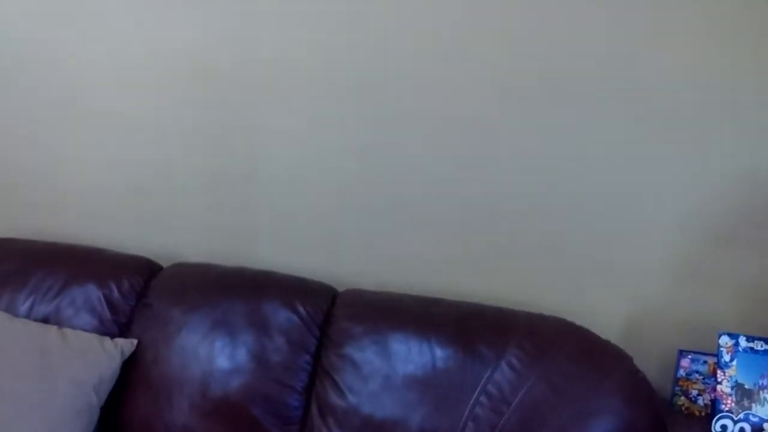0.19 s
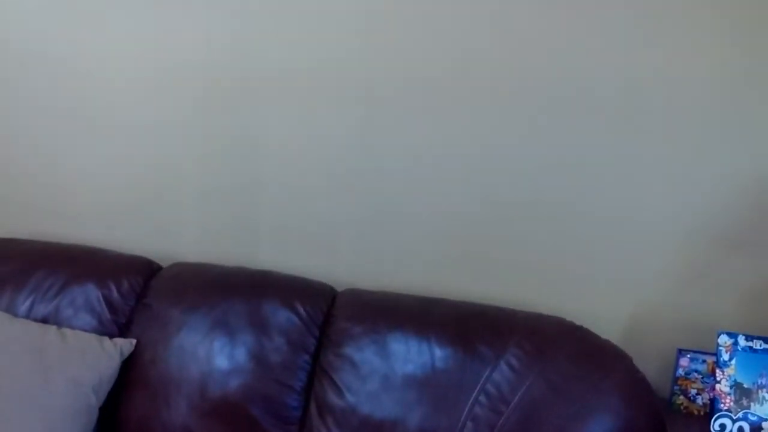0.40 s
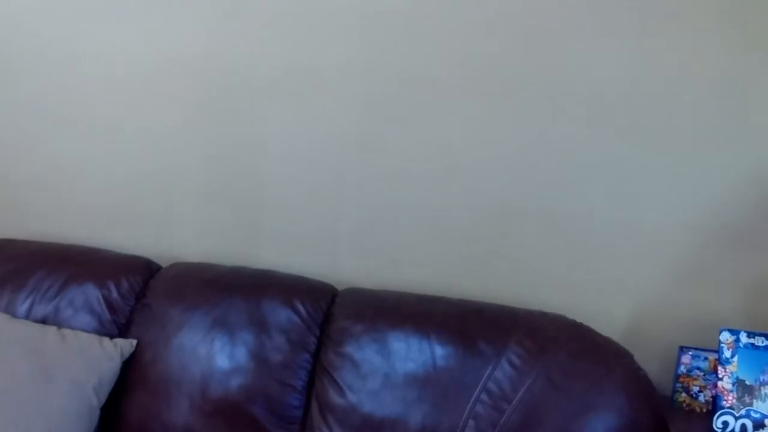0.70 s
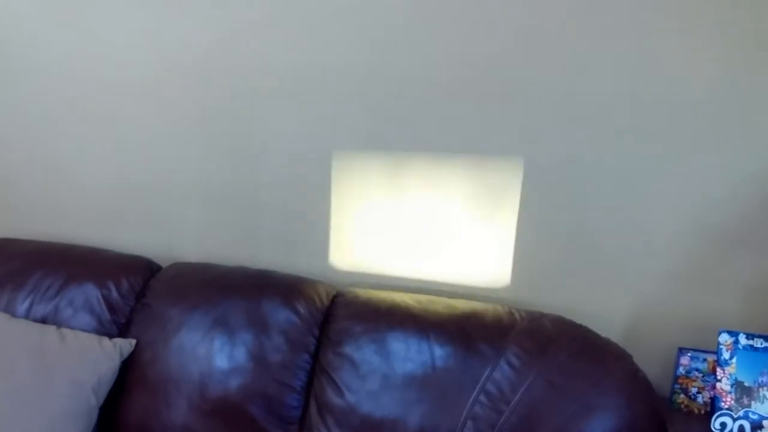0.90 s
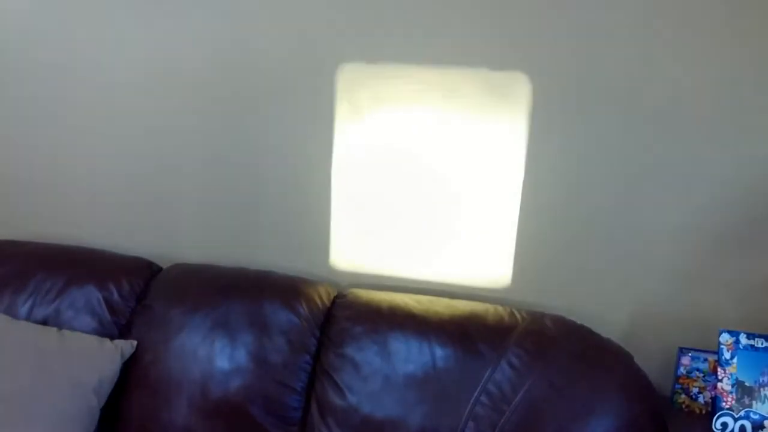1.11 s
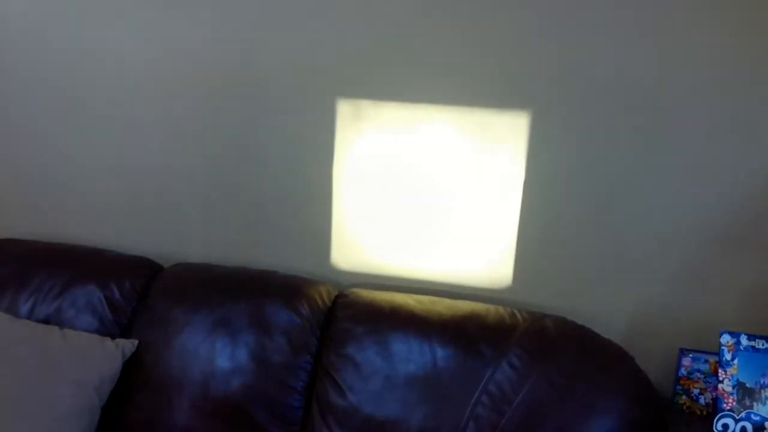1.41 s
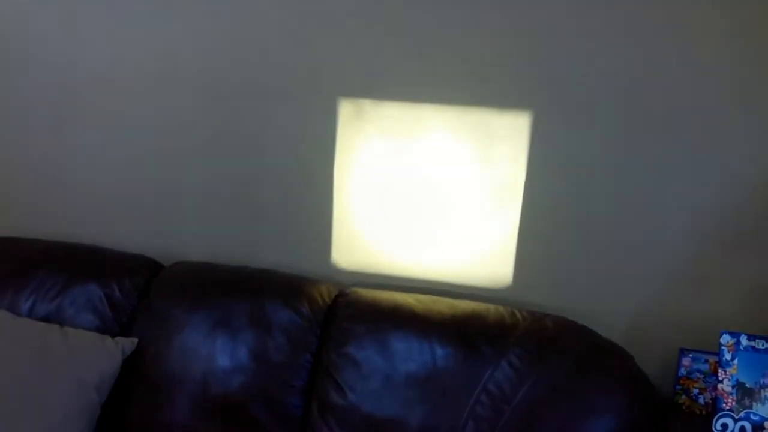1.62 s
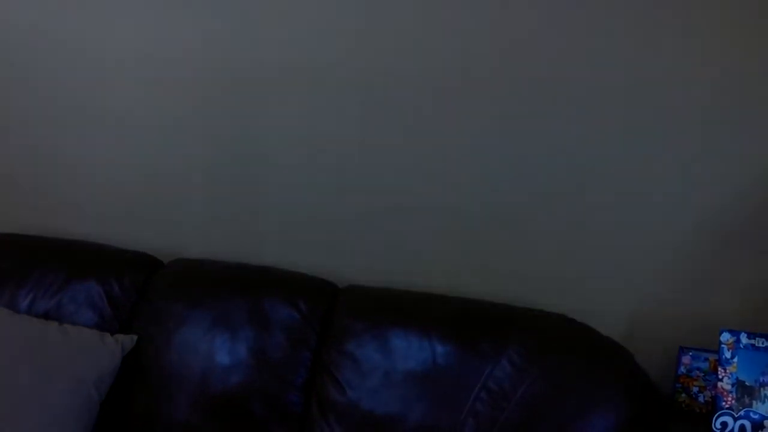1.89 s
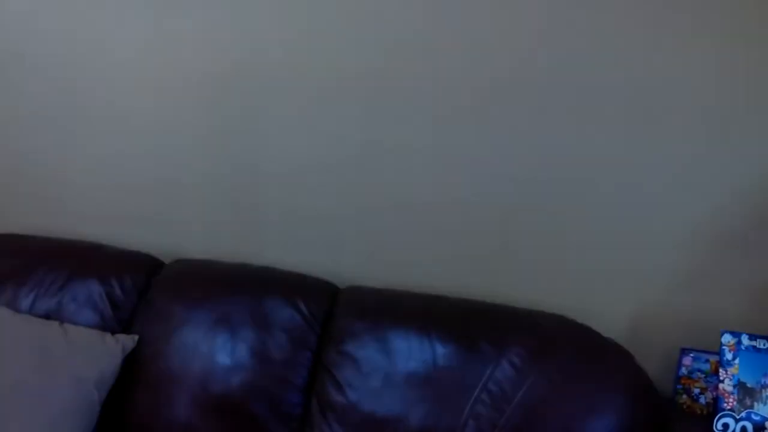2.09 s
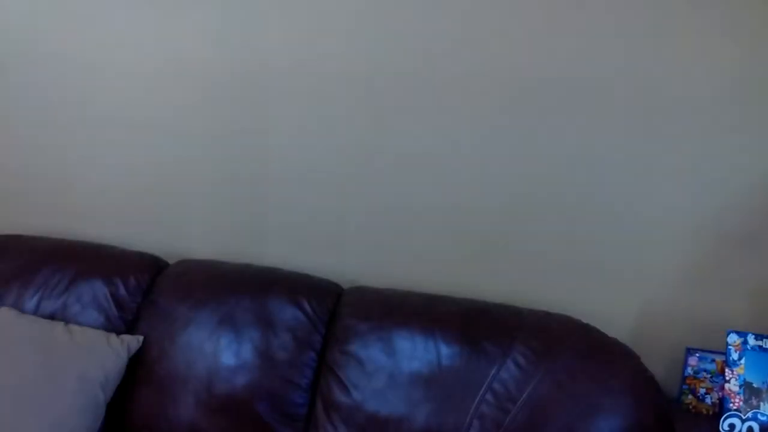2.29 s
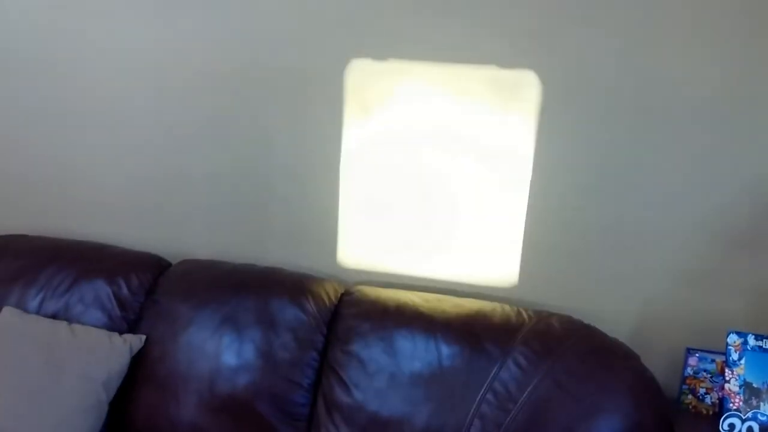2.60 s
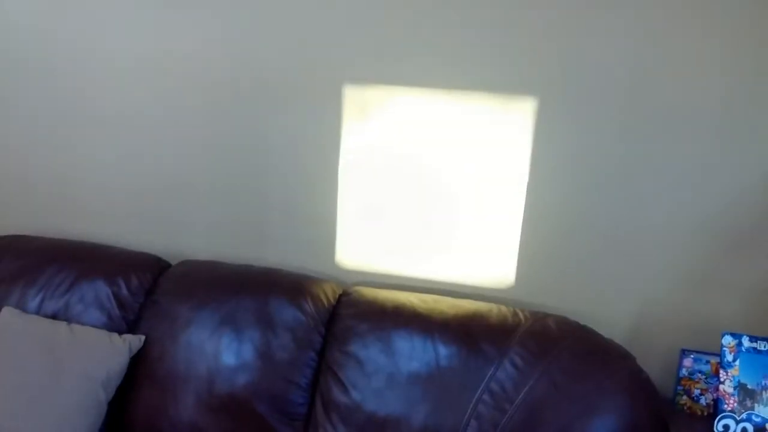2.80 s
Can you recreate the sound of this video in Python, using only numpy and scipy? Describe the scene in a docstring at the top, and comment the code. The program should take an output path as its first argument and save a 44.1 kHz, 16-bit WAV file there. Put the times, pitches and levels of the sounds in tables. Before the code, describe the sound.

Mechanical slide projector close by on the left: a clattering burst of clunks, knocks, snaps and clacks, a short pause with only fan whir, then the same sequence again, in a quiet furnished room with short reverberation.

```python
"""A slide projector runs twice through its change cycle in a small living room, left of the microphones.
Each cycle: the drive engages with a clunk, levers knock, a latch snaps, a spring pings, the slide gate taps,
the shutter clacks open and the drive comes to rest with a hollow tock; the first cycle also scrapes.
Blows are chatters of filtered noise with damped modes. Fan noise and motor hum run throughout."""
import sys
import numpy as np
from scipy import signal
from scipy.fft import rfft, irfft
from scipy.io import wavfile
from scipy.ndimage import uniform_filter1d

SR = 44100
rng = np.random.default_rng(int(sys.argv[2]) if len(sys.argv) > 2 else 0)


def int16_out(signal):
    """Quantize to a 16-bit WAV file."""
    q = np.round(np.clip(np.atleast_2d(signal).T, -1, 1) * 32767)
    wavfile.write(sys.argv[1], SR, q.astype(np.int16))


N = 130095

# Drive engaging: t/s, level/dB, chatter/s
CLUNK_BLOWS = [(.2212, -7.5, 0.0017), (.230, -5, 0.011), (1.852, -8.5, 0.003), (1.862, -7.5, 0.0071)]
# Spectral shape of small light parts: f/Hz, density/dB
TICK_COLOUR = [(250, -47.5), (800, -9), (2800, -9.5), (4000, -19.5), (7000, -9), (9500, 6.5), (12000, -8)]
# Ringing of the frame: f/Hz, level/dB re the blow, t60/s
FRAME_MODES = [(830, -18, 0.081), (1563, -13, 0.092), (2865, -13.5, 0.044), (3417, -19, 0.065)]


def undb(db):
    """Decibels to gain."""
    return 10 ** (np.asarray(db) / 20)


def unit(x):
    """Scale to rms 1."""
    return x / np.sqrt(np.mean(x ** 2))


def along(points, hz):
    """Read the second column of a table on a log-frequency axis."""
    p = np.array(points, float)
    return np.interp(np.log(hz + 1), np.log(p[:, 0]), p[:, 1])


def colour(x, points, keep_power=True):
    """Minimum-phase filter with the given shape; keep_power leaves the power of white noise unchanged."""
    size = 2048
    gain = undb(along(points, np.fft.rfftfreq(size, 1 / SR)))
    # Folding the cepstrum onto positive times makes the filter causal
    cepstrum = irfft(np.log(unit(gain) if keep_power else gain))
    cepstrum[1:size // 2] *= 2
    cepstrum[size // 2 + 1:] = 0
    impulse = irfft(np.exp(rfft(cepstrum)))
    return signal.fftconvolve(x, impulse)[:len(x)]


def blend(a, b, like):
    """Mix a second channel that resembles a by the share like, at equal power."""
    return np.array([a, like * a + np.sqrt(1 - like ** 2) * b])


def diffuse(count):
    """Two noises that are alike in the bass and unrelated above."""
    crossover_hz = 530
    a, b = rfft(rng.standard_normal((2, count)))
    like = 1 / (1 + (np.fft.rfftfreq(count, 1 / SR) / crossover_hz) ** 4)
    return irfft(blend(a, b, like), count)


def ring(modes, t):
    """Damped modes: the longer one rings, the slower it swells; each blow detunes them a little."""
    total = 0
    for hz, db, t60 in modes:
        detune = 1 + 0.0045 * rng.standard_normal()
        swell = 1 - np.exp(-t / (.05 * t60))
        decay = np.exp(-np.log(1000) * t / t60)
        total = total + undb(db) * np.sin(2 * np.pi * hz * detune * t) * swell * decay
    return total


def part(blows, shape, decay_s, modes=(), right_db=0):
    """Each blow is a short chatter of contacts that dies away in the part's dense resonances and rings its modes."""
    rise_s, rough_db, likeness = 0.0001, 2.8, 0.13
    t = np.arange(SR // 3) / SR
    out, rings = np.zeros((2, N + len(t))), np.zeros(N + len(t))
    for start, db, chatter_s in blows:
        roughness = unit(uniform_filter1d(rng.standard_normal(len(t)), size=30))
        grain = undb(rough_db * roughness)
        env = np.minimum(t / rise_s, 1) * np.exp(-np.maximum(t - chatter_s, 0) / decay_s)
        a, b = rng.standard_normal((2, len(t))) * grain * env
        # Every burst gets the energy of its smooth envelope
        level = undb(db) * np.sqrt(np.sum(env ** 2) / np.sum(a ** 2))
        i = int(start * SR)
        out[:, i:i + len(t)] += level * blend(a, b, likeness)
        rings[i:i + len(t)] += undb(db) * ring(modes, t)
    left, right = (colour(c[:N], shape) + rings[:N] for c in out)
    return np.array([left, right * undb(right_db)])


def fan():
    """Air rushes through the vents, the motor hums, and something brushes lightly once a turn."""
    # Air noise: f/Hz, density/dB
    air_colour = [(60, -11), (170, -2.5), (360, -6), (445, 10), (560, -4), (800, 6.5), (990, 2.5),
                  (1200, 0.5), (2600, -2.5), (2850, -2.5), (3400, -11.5), (4500, -23.5), (7000, -16.5),
                  (9600, 0), (12500, -20.5)]
    # Motor hum: f/Hz, level/dB (rms)
    hum_tones = [(119.9, -55.5), (239.8, -62.5)]
    # Brushing: f/Hz, density/dB
    brush_colour = [(1700, -42), (2850, 61), (3900, -20)]
    air_db, brush_db, scatter_db = -43.5, -43, 2.5
    turn_hz, first_s, decay_s = 16.25, .0605, .004
    t = np.arange(N) / SR
    turns = (t - first_s) * turn_hz + 1
    size = undb(brush_db + scatter_db * rng.standard_normal(size=100))[turns.astype(int)]
    brush = size * np.exp(-(turns % 1) / turn_hz / decay_s)
    hum = sum(undb(db) * np.sqrt(2) * np.sin(2 * np.pi * (hz * t + rng.random())) for hz, db in hum_tones)
    rush = [undb(air_db) * colour(air, air_colour) for air in diffuse(N)]
    brushing = [colour(brush * rub, brush_colour) for rub in diffuse(N)]
    return hum + np.array(rush) + np.array(brushing)


def settling(blows, count=4):
    """A few ever weaker ticks follow each heavy blow at random moments as loose parts settle."""
    span_s, first_db, fade_db_per_s = .07, -7, 110
    ticks = []
    for start, db, _ in blows:
        for late in span_s * np.sqrt(rng.random(count)):
            ticks.append((start + late, db + first_db - fade_db_per_s * late))
    return ticks


def light_ticks():
    """Light ticks of the changer, among them the slide's second tap, and of settling parts: brief noise bursts."""
    # Light ticks of the changer: t/s, level/dB
    changer_ticks = [(0.215, -15), (0.2922, -15.5), (0.392, -31), (.402, -21), (0.6656, -17), (0.9228, -15),
                     (1.042, -17.5), (1.169, -23.5), (1.177, -22.5), (1.838, -26.5), (2.024, -17),
                     (2.071, -22), (2.103, -16), (2.2882, -16), (2.544, -14), (2.661, -14), (2.7912, -21)]
    chatter_s = 0.0029
    blows = [(start, db, chatter_s) for start, db in changer_ticks + settling(CLUNK_BLOWS)]
    return part(blows, TICK_COLOUR, decay_s=0.0032, right_db=-3)


def rattles():
    """Each loose part ticks and rings very briefly at its own pitch."""
    # Clinking parts: t/s, level/dB, f/Hz
    clinks = [(0.221, -18, 3150), (0.414, -27.5, 2950), (.491, -20, 2594), (0.681, -19.5, 1595),
              (.72, -24, 2560), (1.851, -17, 1806), (2.037, -26, 2840), (2.089, -25, 2060),
              (2.114, -20.5, 2710), (2.304, -17.5, 1587), (2.328, -19, 2370)]
    chatter_s, ring_db, t60_s = 0.0013, 5, 0.032
    return sum(part([(start, db, chatter_s)], TICK_COLOUR, decay_s=0.01, modes=[(hz, ring_db, t60_s)])
               for start, db, hz in clinks)


def clunks():
    """The engaging drive strikes the frame, which rings on."""
    # Drive clunk: f/Hz, density/dB
    clunk_colour = [(230, -58), (420, -11), (600, -16), (1650, -10.5), (3300, -10), (4200, -16), (5200, -7),
                    (7600, -6.5), (9600, 4), (12000, -4), (15000, -21.5)]
    return part(CLUNK_BLOWS, clunk_colour, decay_s=0.013, modes=FRAME_MODES)


def case():
    """The hollow case booms in low damped modes as the drive takes up the load."""
    # Booms: t/s, level/dB
    booms = [(0.234, -22), (1.864, -29.5)]
    # Case resonances: f/Hz, level/dB re the boom, t60/s
    case_modes = [(145.8, -4, 0.29), (433, 5.5, 0.12)]
    t = np.arange(N) / SR
    boom = sum(undb(db) * ring(case_modes, np.maximum(t - start, 0)) for start, db in booms)
    return np.array([boom, boom])


def scrapes():
    """The slide scrapes along its guide: one long chatter of light contacts."""
    # Scraping: t/s, level/dB, length/s
    strokes = [(.345, -30, 0.083)]
    return part(strokes, TICK_COLOUR, decay_s=0.0044)


def knocks():
    """Levers knock and set the frame ringing."""
    # Lever knocks: t/s, level/dB, chatter/s
    lever_blows = [(.4408, -6, 0.0098), (.7, -9, 0.0046), (2.1243, -6, 0.0067), (2.146, -18, 0.0062),
                   (2.322, -10, 0.0079)]
    # Lever: f/Hz, density/dB
    knock_colour = [(200, -45), (450, -13), (820, -7.5), (1600, -3.5), (2700, -8), (3800, -13), (6300, -11),
                    (9600, 7), (11000, 0), (15500, -8.5)]
    return part(lever_blows, knock_colour, decay_s=0.012, modes=FRAME_MODES)


def snaps():
    """The latch snaps over in a short bright burst."""
    # Latch snaps: t/s, level/dB, chatter/s
    latch_blows = [(.5582, -2.5, 0.0045), (2.1792, -3.5, 0.0068)]
    # Latch: f/Hz, density/dB
    snap_colour = [(270, -37), (440, -27.5), (1400, -15), (3500, -12), (4200, -18), (7600, -10.5),
                   (9200, 7.5), (10500, -2.5), (13000, -13)]
    return part(latch_blows, snap_colour, decay_s=0.0049)


def pings():
    """The spring pings: a tiny chatter with a high ringing mode."""
    # Spring pings: t/s, level/dB, chatter/s
    spring_blows = [(.863, -20.5, 0.0099), (2.483, -20.5, 0.008)]
    # Spring contact: f/Hz, density/dB
    ping_colour = [(1200, -23), (5500, -24), (8000, -17), (9700, 6), (11500, -19)]
    # Spring ringing: f/Hz, level/dB re the blow, t60/s
    spring_modes = [(9645, 2, 0.045)]
    return part(spring_blows, ping_colour, decay_s=0.0022, modes=spring_modes)


def taps():
    """Short, soft taps: two in the slide gate, and the first knock of the second clunk."""
    # Soft taps, the middle one opening the second clunk: t/s, level/dB, chatter/s
    tap_blows = [(.9115, -15.5, 0.0034), (1.8485, -13.5, 0.0052), (2.5338, -16.5, 0.0032)]
    # Tap: f/Hz, density/dB
    tap_colour = [(250, -39), (1100, -8.5), (1500, 7.5), (2300, -3.5), (3800, -27), (6500, -12), (8200, -7),
                  (9700, 7), (12000, -15)]
    return part(tap_blows, tap_colour, decay_s=.0055)


def clacks():
    """The shutter clacks open and rebounds."""
    # Clacks and rebounds: t/s, level/dB, chatter/s
    shutter_blows = [(.981, -5.5, 0.007), (1.004, -17.5, 0.011), (1.021, -12, 0.0042), (2.6036, -5, 0.0034),
                     (2.625, -18, 0.02), (2.643, -14.5, 0.0035)]
    # Shutter: f/Hz, density/dB
    clack_colour = [(280, -36), (900, -21), (1700, -13), (4200, -21.5), (5200, -13), (7200, -12.5),
                    (8900, -1), (11000, -4), (13500, -12.5)]
    return part(shutter_blows, clack_colour, decay_s=0.011, right_db=1.5)


def tocks():
    """The drive comes to rest with a hollow tock of closely spaced modes."""
    # Drive stopping: t/s, level/dB, chatter/s
    rest_blows = [(1.1828, -22, 0.0022), (2.7995, -24, 0.0015)]
    # Stop: f/Hz, density/dB
    tock_colour = [(270, -22), (490, 0.5), (750, -13.5), (2550, -10.5), (3100, -0.5), (3700, -20),
                   (10000, -13.5), (13000, -17.5)]
    # Hollow ringing: f/Hz, level/dB re the blow, t60/s
    rest_modes = [(462, 5, 0.06), (530, 5, 0.035), (600, 6, 0.04)]
    return part(rest_blows, tock_colour, decay_s=0.0075, modes=rest_modes)


def changer():
    """All moving parts of the slide changer, each with its direct sound and its send into the room in dB."""
    return [(light_ticks(), 3.5), (rattles(), -3.5), (clunks(), -1.5), (case(), -7.5),
            (scrapes(), 7.5), (knocks(), -1.0), (snaps(), 1.5), (pings(), -3),
            (taps(), -5), (clacks(), -0.5), (tocks(), -9)]


def room(x):
    """Dense reflections of a furnished room, with their own level and decay in each band."""
    # Reverberation: f/Hz, level/dB re the sound sent in, t60/s, build-up/s
    bands = [(500, 1.5, 0.33, 0.0027), (1800, -1, 0.31, 0.0023), (8600, -9, 0.41, 0.002),
             (15000, -13.5, 0.39, 0.0015)]
    delay_s = 0.00081
    t = np.arange(SR // 2) / SR
    noise = rfft(diffuse(len(t)))
    hz_axis = np.fft.rfftfreq(len(t), 1 / SR)
    centres = np.array(bands)[:, 0]
    tail = 0
    for pick, (hz, db, t60, build_s) in zip(np.eye(len(bands)), bands):
        build = 1 - np.exp(-np.maximum(t - delay_s, 0) / build_s)
        env = build * np.exp(-np.log(1000) * t / t60)
        # Neighbouring bands crossfade
        band = along(np.column_stack([centres, pick]), hz_axis)
        tail = tail + undb(db) * irfft(noise * band, len(t)) * env / np.sqrt(np.sum(env ** 2))
    return signal.fftconvolve(x[None], tail, axes=1)[:, :N]


def scene():
    """Each part stirs the room in its own way; from the left, its direct sound comes later and weaker at right."""
    # Right microphone against the left, direct sound: f/Hz, level/dB
    right_direct = [(500, -7.5), (1500, -9.5), (5000, -5.5), (11000, -14)]
    # Right microphone, fan and room sound: f/Hz, level/dB
    right_room = [(500, -6), (1800, -11), (4500, -1.5), (14000, -11.5)]
    right_lag_s = .00038
    parts = changer()
    left, right = sum(x for x, send_db in parts)
    reverb = sum(room(x[0] * undb(send_db)) for x, send_db in parts)
    around_left, around_right = fan() + reverb
    late_right = np.roll(right, int(round(right_lag_s * SR)))
    right = colour(late_right, right_direct, keep_power=False)
    return np.array([left + around_left, right + colour(around_right, right_room, keep_power=False)])


def record(dry):
    """The loudest peaks are rounded off; the deep bass and the top are cut."""
    top_hz = 15900
    clipped = dry / (1 + (dry / .92) ** 6) ** (1 / 6)
    thinned = signal.sosfilt(signal.butter(1, 45, "high", fs=SR, output="sos"), clipped)
    return signal.sosfilt(signal.ellip(10, .2, 70, top_hz, fs=SR, output="sos"), thinned)


dry = scene()
out = record(dry)
int16_out(out)
```